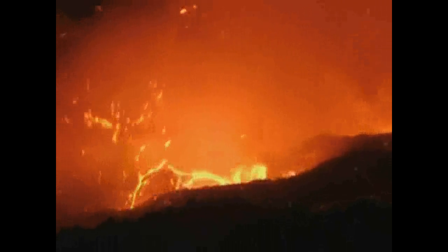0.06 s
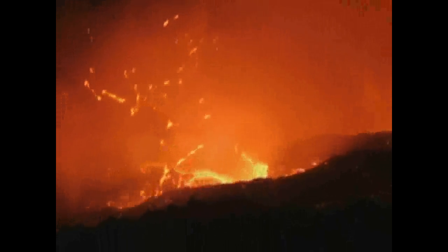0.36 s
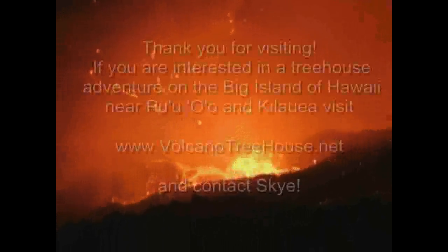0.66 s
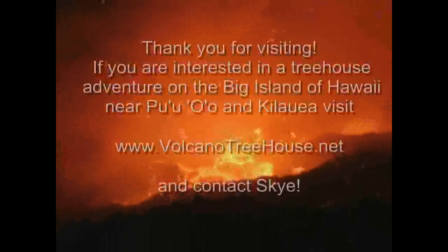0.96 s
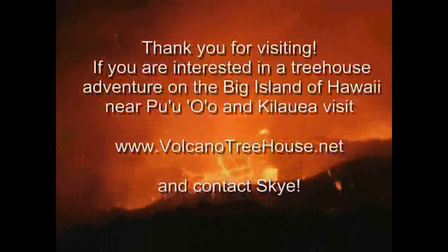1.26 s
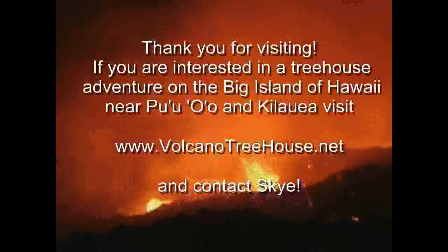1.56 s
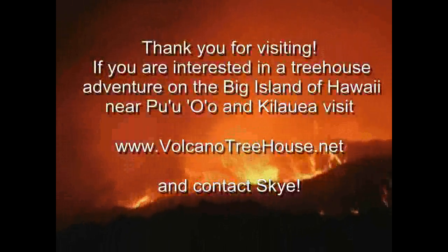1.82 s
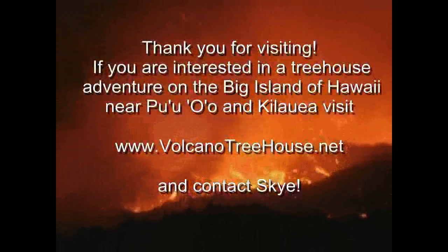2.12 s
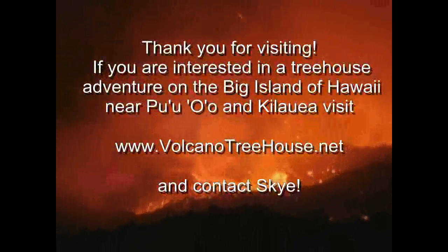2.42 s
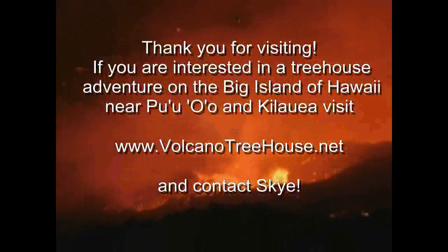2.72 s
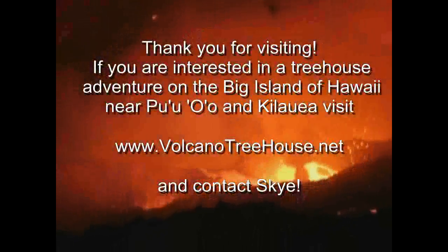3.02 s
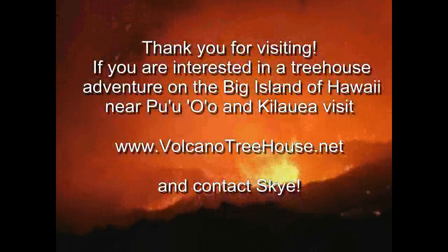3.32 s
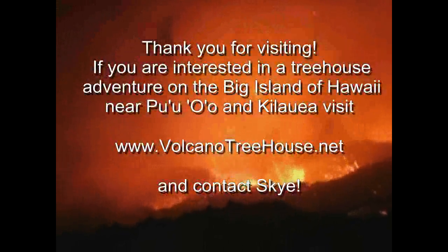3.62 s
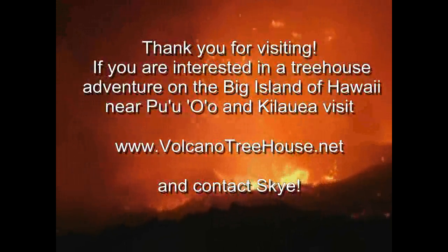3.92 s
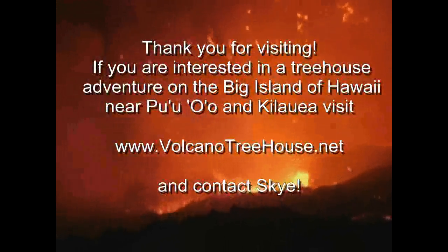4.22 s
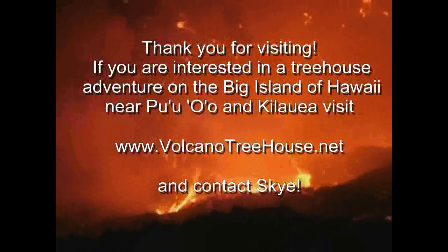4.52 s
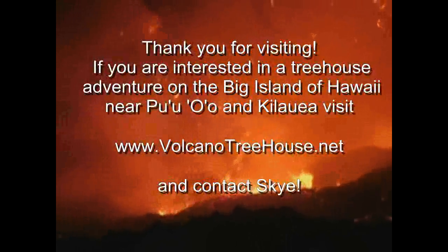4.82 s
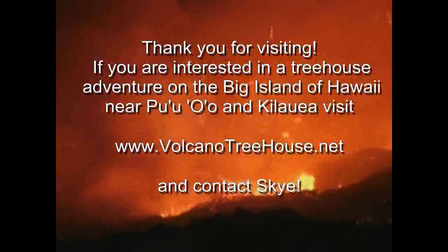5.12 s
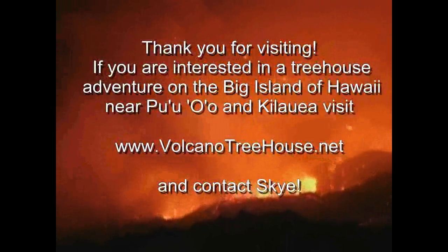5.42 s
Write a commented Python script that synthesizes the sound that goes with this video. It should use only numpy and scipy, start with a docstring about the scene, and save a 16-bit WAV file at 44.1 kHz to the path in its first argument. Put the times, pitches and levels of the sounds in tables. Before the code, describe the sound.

On a windy shore, lava hitting seawater makes a sudden roar of steam, followed by smaller hissing swells, popping steam pockets and light ticks of falling spatter. After about three seconds the roar builds again with a cluster of sharp bursts, then weakens toward the end. Gusts shove at the small microphone with low rumbles and thumps that choke the roar for instants, and the treble is muffled and grainy.

```python
"""A sudden roar of steam, in strong wind: lava is pouring into the sea. Jets of steam hiss and roar
in surges, pockets of steam burst, and thrown clots of lava crackle down.
The wind rumbles on the microphone of a small camera. Its hardest swirls overload the input,
which chokes the roar for a few milliseconds. The camera takes few samples a second,
so the treble is dull and gritty."""
import sys
import numpy as np
from scipy import signal
from scipy.fft import rfft, irfft, next_fast_len
from scipy.io import wavfile
from scipy.ndimage import uniform_filter1d

SR = 44100
rng = np.random.default_rng(int(sys.argv[2]) if len(sys.argv) > 2 else 0)


def transcribe(signal):
    """Save signal, clipped to [-1, 1], as a 16-bit WAV file at the path in sys.argv[1]."""
    frames = np.atleast_2d(signal).T
    limited = np.clip(frames, -1, 1)
    pcm = np.round(limited * 32767).astype(np.int16)
    wavfile.write(sys.argv[1], SR, pcm)


N = 245637
T = np.arange(N) / SR
CAMERA_RATE_HZ = 8000
FFT_SIZE = next_fast_len(N, True)
BINS_HZ = np.maximum(np.arange(FFT_SIZE // 2 + 1) * SR / FFT_SIZE, 1)

# The bright tone shared by steam hiss and lava spatter. Columns: pitch_hz, level_db
HISS_TONE = [(150, -0.5), (400, -15), (900, -4.5), (1500, -3), (2100, -3), (2800, -3), (3400, -4),
             (4000, -6.5)]


def steam_jets(hiss_db, roar_db):
    """Rushing steam makes a bright hiss over a deep roar, and both sputter together."""
    # The tone of the deep roar. Columns: pitch_hz, level_db
    roar_tone = [(120, -22), (280, 0), (520, 3.5), (720, 2), (1100, 1.5), (1500, -8.5), (2500, -37),
                 (4000, -35)]
    sputter = wander(per_s=70)
    hiss = noise(HISS_TONE) * gain(hiss_db + 4.5 + 0.82 * sputter)
    roar = steady(noise(roar_tone), span_s=0.036) * gain(roar_db - 4.5 + 1.33 * sputter)
    return hiss + roar


def steam_levels():
    """Hiss and roar over time, in dB: each surge adds its power to the simmering shore."""
    # Surges of steam. Columns: start_s, rise_s, hold_s, fade_db_per_s, hiss_db, roar_db
    surges = [(0.0, 0.003, 0.28, 82, -23, -14), (0.286, 0.013, 0.019, 150, -30.5, -16),
              (0.43, 0.041, 0.023, 69, -28.5, -21.5), (0.553, 0.062, .15, 50, -36, -29.5),
              (0.753, 0.011, 0.12, 95, -32, -25.5), (1.192, 0.042, 0.058, 43, -32.5, -29),
              (1.302, 0.077, 0.073, 52, -29.5, -26), (1.536, 0.11, .16, 69, -31, -22.5),
              (2.1, 0.046, 0.047, 105, -29, -19.5), (2.252, 0.018, .03, 115, -34, -25),
              (2.439, 0.013, 0.024, 122, -35, -29.5), (2.77, 0.16, 0.11, 18, -26.5, -18.5),
              (3.117, 0.088, 0.2, 51, -24, -14), (3.399, 0.0039, 0.013, 104, -14.5, -28),
              (3.513, 0.023, 0.091, 42, -23.5, -22.5), (3.918, 0.018, 0.023, 119, -26, -22.5),
              (4.064, 0.083, 0.022, 67, -32.5, -27), (4.23, 0.042, 0.1, 130, -32.5, -28),
              (4.435, 0.042, 0.008, 125, -33, -22), (4.727, .04, 0.41, 37, -39.5, -32.5),
              (5.451, 0.061, .06, 50, -33, -28.5)]
    hiss_power, roar_power = gain(-40.5) ** 2, gain(-33.5) ** 2  # the simmer between surges
    for start_s, rise_s, hold_s, fade_db_per_s, hiss_db, roar_db in surges:
        flow = swell(start_s, rise_s, hold_s, fade_db_per_s)
        hiss_power += (flow * gain(hiss_db)) ** 2
        roar_power += (flow * gain(roar_db)) ** 2
    return 10 * np.log10(hiss_power), 10 * np.log10(roar_power)


def steam_blasts():
    """Pockets of steam burst and quickly die away; a larger pocket sounds deeper."""
    # Bursting pockets. Columns: start_s, level_db, pitch_hz, decay_s
    pockets = [(0.002, -4, 1180, 0.063), (0.486, -8, 1030, 0.025), (0.791, -11, 1810, 0.026),
               (1.774, -4.5, 700, 0.015), (2.138, -8.5, 730, 0.06), (2.96, -7.5, 1070, 0.031),
               (3.323, -15, 510, 0.046), (3.358, -6, 789, 0.031), (3.405, 1, 494, 0.017),
               (3.612, -9, 585, 0.061), (4.499, -11.5, 517, 0.022), (4.566, -11, 520, 0.023)]
    out = np.zeros(N)
    for start_s, level_db, pitch_hz, decay_s in pockets:
        age_s = np.maximum(T - start_s, 0)
        loudness = (1 - np.exp(-age_s / 0.0005)) * np.exp(-age_s / max(decay_s, 0.005))
        burst = noise([(pitch_hz / 4, -6), (pitch_hz, 0), (pitch_hz * 4, -42)])
        out += gain(level_db - 7) * loudness * burst
    return out


def lava_spatter(hiss_db, per_s, spread_db):
    """Clots of lava crack and land: many uneven ticks, louder when the jets are louder."""
    hits = rng.random(N) < per_s / SR
    sizes = gain(spread_db * np.minimum(rng.exponential(size=N), 4))
    ticks = hits * sizes * rng.choice([-1, 1], N)
    return shape_tone(ticks, HISS_TONE) * gain(hiss_db - 2)


def heat_shimmer(sound, per_s, depth_db):
    """Hot, moving air lets each band of pitch, a third of an octave wide, swell and fade on its own."""
    thirds_below_top = np.clip(3 * np.log2(CAMERA_RATE_HZ / 2 / BINS_HZ), 0, 12)
    spectrum, out = rfft(sound, FFT_SIZE), np.zeros(N)
    for third in range(13):
        share = np.maximum(1 - np.abs(thirds_below_top - third), 0)
        band = irfft(spectrum * share, FFT_SIZE)[:N]
        out += band * gain(depth_db * wander(per_s))
    return out * np.std(sound) / np.std(out)


def add_echoes(sound):
    """The sound returns a moment later by short paths, giving a hollow tone that slowly shifts."""
    # Nearby reflections. Columns: delay_s, strength, drift_octaves
    echoes = [(.00238, -0.11, 0.05), (.0042, 0.24, 0.2496)]
    out = sound.copy()
    for delay_s, strength, drift_octaves in echoes:
        drifting_delay_s = delay_s * 2 ** (drift_octaves * wander(per_s=2))
        out += strength * np.interp(T - drifting_delay_s, T, sound)
    return out


def wind(rumble_db, flutter_db):
    """Big swirls of air rumble in uneven shoves; small ones flutter at the edge of the microphone hole."""
    # The tone of the big swirls. Columns: pitch_hz, level_db
    rumble_tone = [(10, -15), (22, 0.5), (40, 3.5), (65, -1.5), (100, -6.5), (135, -17), (200, -27),
                   (400, -70), (900, -71)]
    # The tone of the small swirls. Columns: pitch_hz, level_db
    flutter_tone = [(60, -24), (120, 5), (190, 0), (280, -3.5), (420, -12), (700, -34.5), (1500, -51),
                    (4000, -52.5)]
    rumble = steady(noise(rumble_tone), span_s=0.044) * gain(rumble_db + 3 + 1.8 * wander(per_s=61))
    flutter = steady(noise(flutter_tone), span_s=0.038) * gain(flutter_db + 2)
    return rumble + flutter


def wind_levels():
    """Rumble and flutter over time, in dB: each gust adds its power to the breeze."""
    # The breeze under the gusts. Columns: time_s, rumble_db
    breeze = [(0, -10.5), (.4, -18), (.9, -17.5), (1.1, -22), (1.3, -16.5), (1.7, -15.5), (1.93, -24),
              (2.25, -15), (2.45, -13.5), (2.6, -25), (2.95, -15.5), (3.3, -10), (3.7, -6), (3.88, -16.5),
              (4.3, -22.5), (4.8, -20), (5.05, -22.5), (5.57, -22.5)]
    # Gusts of wind. Columns: start_s, hold_s, rumble_db, flutter_db
    gusts = [(0.0, 0.14, -26, -7.5), (0.242, 0.11, -8.5, -19), (0.445, 0.032, -12.5, -14.5),
             (0.568, 0.023, -17, -20), (0.711, 0.036, -11, -24), (0.78, 0.061, -10.5, -10.5),
             (0.874, 0.058, -18, -23), (1.27, 0.039, -15.5, -27), (1.351, 0.012, -9.5, -38),
             (1.58, .025, -13, -34), (1.778, 0.033, -5.5, -25), (1.966, 0.027, -13.5, -44),
             (2.067, 0.044, -4, -22), (2.172, 0.034, -9, -37), (2.327, 0.029, -16, -25),
             (2.44, 0.03, -9, -28), (2.716, 0.025, -11.5, -29), (2.791, 0.03, -11.5, -26),
             (2.884, .02, -19, -20.5), (3.32, 0.37, -12.5, -14), (3.775, 0.041, -17, -17.5),
             (3.915, 0.017, -2.5, -19), (4.016, 0.065, -8.5, -28), (4.092, 0.052, -8.5, -18),
             (4.206, 0.043, -9, -23.5), (4.311, .03, -11, -24), (4.443, 0.054, -11.5, -12.5),
             (4.559, 0.05, -17, -15), (4.95, 0.01, -23, -30)]
    rumble_power = gain(np.interp(T, *np.transpose(breeze))) ** 2
    flutter_power = gain(-37) ** 2  # the breeze's own faint flutter
    for start_s, hold_s, rumble_db, flutter_db in gusts:
        force = swell(start_s, rise_s=0.011, hold_s=hold_s, fade_db_per_s=254)
        rumble_power += (force * gain(rumble_db)) ** 2
        flutter_power += (force * gain(flutter_db)) ** 2
    return 10 * np.log10(rumble_power), 10 * np.log10(flutter_power)


def add_wind_thumps(air, rumble_db):
    """A hard swirl sweeps smaller ones aside: a push, a sudden flip to suction, then a rebound."""
    # The hardest swirls, which overload the microphone. Columns: time_s, level_db, half_length_s
    hard_swirls = [(0.273, 8.5, 0.0024), (0.284, 7, 0.0023), (0.345, 3, 0.0032), (0.803, 2.5, .0028),
                   (0.842, 3, 0.002), (1.686, 2.5, 0.0045), (1.79, 4.5, 0.0038), (1.845, 6.5, 0.005),
                   (2.087, 8, 0.0035), (2.106, 9.5, 0.0036), (2.257, 3, 0.0063), (2.465, 4, 0.0062),
                   (2.524, 0, 0.005), (2.805, 10, 0.0032), (3.34, 11, 0.0035), (3.349, 5.5, 0.0021),
                   (3.398, 7.5, 0.0051), (3.479, 8, 0.00374), (3.547, 1, .0025), (3.605, 10, 0.0032),
                   (3.659, 7, 0.004), (3.716, 9, 0.0042), (3.788, 7, 0.0037), (3.919, 11, 0.0035),
                   (4.057, 3.5, 0.0049), (4.098, 4, 0.0027), (4.258, 1, 0.0055), (4.49, 4, 0.0057)]
    out = air.copy()
    for time_s, level_db, half_length_s in stray_swirls(rumble_db) + hard_swirls:
        centre = int(time_s * SR)
        near = slice(max(centre - SR // 20, 0), centre + SR // 20)
        offset = (T[near] - time_s) / half_length_s
        flip = -np.tanh(1.76 * offset) * np.exp(-offset ** 2 / 2)
        rebound = 0.38 * np.exp(-2 * (offset - 2.4) ** 2)
        calm = 1 - 0.71 * np.exp(-(offset / 3.74) ** 2)
        out[near] = out[near] * calm + gain(level_db + 1.5) * (flip + rebound)
    return out


def stray_swirls(rumble_db, per_s=6):
    """Weaker swirls come at random and follow the wind's strength. Gives time_s, level_db, half_length_s."""
    lateness, widths = rng.random((128, 2)).T
    times_s = (np.arange(len(lateness)) + lateness) / per_s
    return [(time_s, rumble_db[int(time_s * SR)] + 6.5, 0.0031 * 2 ** (width - 0.5))
            for time_s, width in zip(times_s, widths) if time_s < T[-1]]


def gain(db):
    """Turn decibels into a number to multiply a sound by."""
    return 10 ** (np.asarray(db) / 20)


def shape_tone(sound, tone):
    """Filter by (pitch_hz, level_db) points, cut what is too high for the camera, and scale to level 1."""
    pitch_hz, level_db = np.transpose(tone)
    curve = gain(np.interp(np.log(BINS_HZ), np.log(pitch_hz), level_db))
    curve *= BINS_HZ < CAMERA_RATE_HZ / 2
    shaped = irfft(rfft(sound, FFT_SIZE) * curve, FFT_SIZE)[:N]
    return shaped / np.std(shaped)


def noise(tone):
    """Random noise with the given tone."""
    return shape_tone(rng.standard_normal(N), tone)


def wander(per_s):
    """A curve that glides to a new random value per_s times a second."""
    step = int(SR / per_s)
    targets = rng.standard_normal(4096)
    return 1.57 * uniform_filter1d(targets[np.arange(N) // step], step)


def steady(sound, span_s):
    """Even out the slow, chance swells in a noise."""
    power = np.abs(signal.hilbert(sound, next_fast_len(N))[:N]) ** 2 / 2
    span = int(span_s * SR)
    return sound / np.sqrt(uniform_filter1d(uniform_filter1d(power, span), span))


def swell(start_s, rise_s, hold_s, fade_db_per_s):
    """A loudness curve that rises, holds and dies away."""
    age_s = T - start_s
    rise = np.clip(age_s / rise_s, 0, 1)
    return rise * gain(-fade_db_per_s * np.maximum(age_s - rise_s - hold_s, 0))


def pass_filter(sound, hz, kind, order):
    """Keep what lies below (lowpass) or above (highpass) hz; a higher order cuts more sharply."""
    return signal.sosfilt(signal.butter(order, hz, kind, fs=SR, output="sos"), sound)


def scene():
    """Steam, lava and wind add up at the microphone."""
    hiss_db, roar_db = steam_levels()
    jets = heat_shimmer(steam_jets(hiss_db, roar_db), per_s=20, depth_db=1.7)
    shore = add_echoes(jets + steam_blasts() + lava_spatter(hiss_db, per_s=250, spread_db=1.5))
    rumble_db, flutter_db = wind_levels()
    air = add_wind_thumps(wind(rumble_db, flutter_db), rumble_db)
    return (shore + air)[None]


def record(dry):
    """The camera's input flattens loud peaks and thins the bass, then the sound is sampled slowly."""
    limit, sharpness, leak = 0.93, 16, 0.06  # leak: the share that still passes in an overload
    squeeze = (1 + np.abs(dry[0] / limit) ** sharpness) ** (1 / sharpness)
    flattened = dry[0] * (leak + (1 - leak) / squeeze)
    sagging = pass_filter(flattened, hz=63.8, kind="highpass", order=1)  # a capacitor lets held levels sag
    dull = pass_filter(sagging, hz=3630, kind="lowpass", order=10)
    sample_times_s = np.arange(N * CAMERA_RATE_HZ // SR + 1) / CAMERA_RATE_HZ
    samples = np.clip(np.interp(sample_times_s, T, dull), -1, 1)  # the biggest swings overshoot and clip
    # straight lines between the slow samples mirror the hiss faintly into the treble
    gritty = np.interp(T, sample_times_s, samples)
    top_hz = 14600
    treble_cut = signal.ellip(8, 0.2, 70, top_hz, fs=SR, output="sos")
    return signal.sosfilt(treble_cut, gritty)[None]


dry = scene()
out = record(dry)
transcribe(out)
```